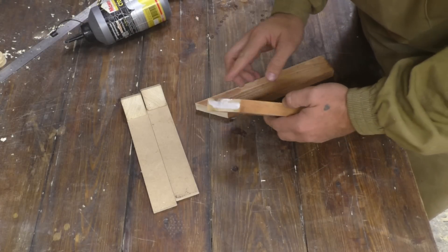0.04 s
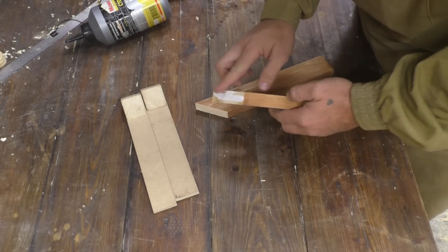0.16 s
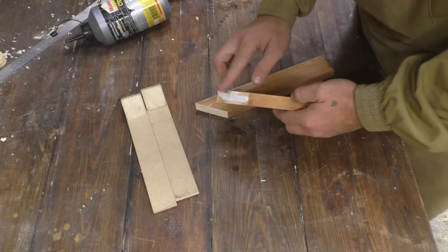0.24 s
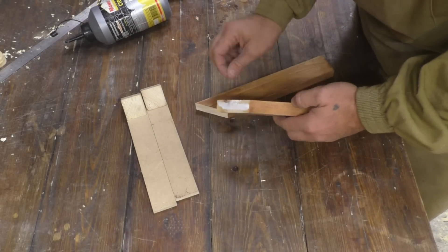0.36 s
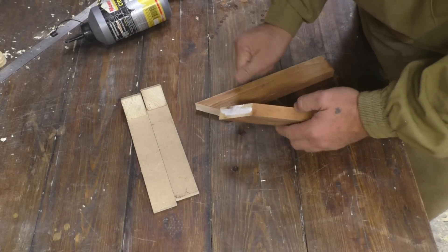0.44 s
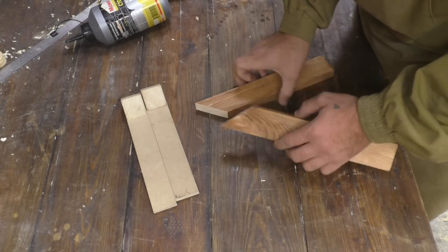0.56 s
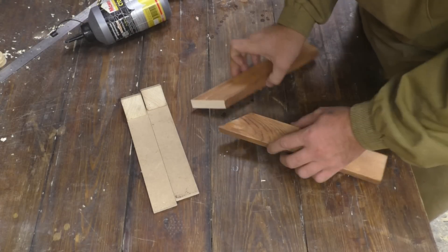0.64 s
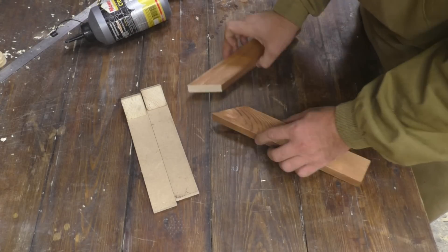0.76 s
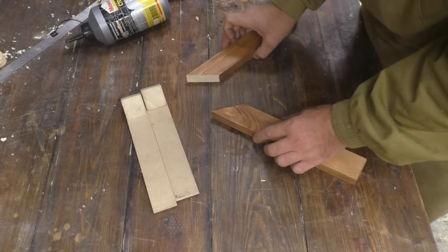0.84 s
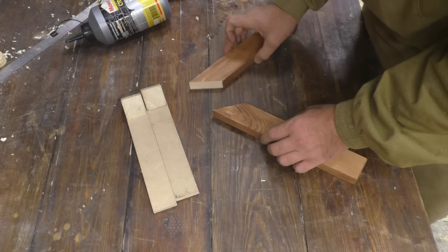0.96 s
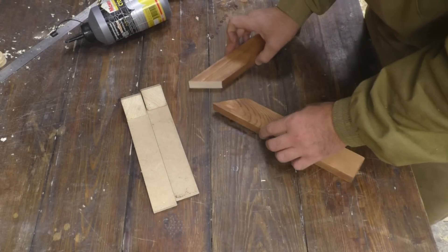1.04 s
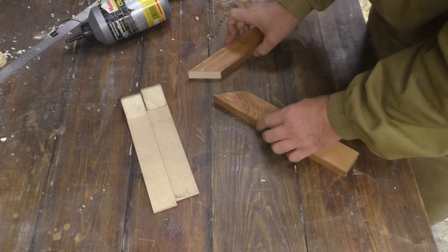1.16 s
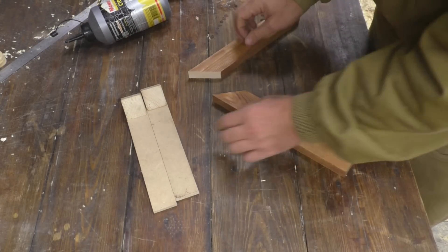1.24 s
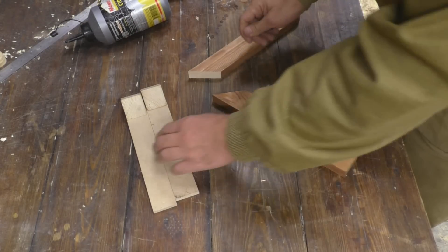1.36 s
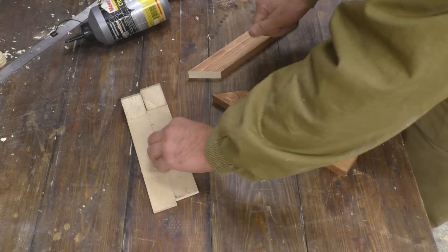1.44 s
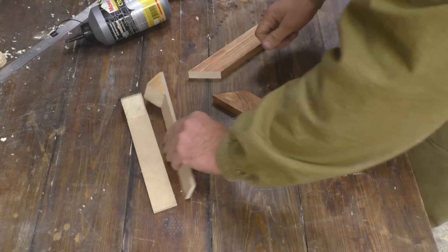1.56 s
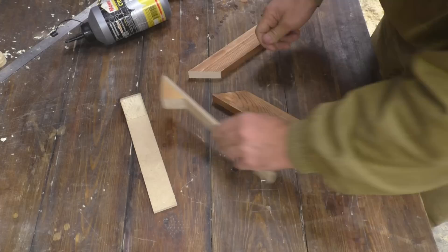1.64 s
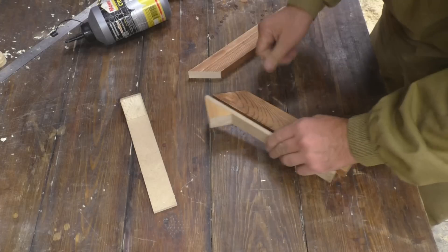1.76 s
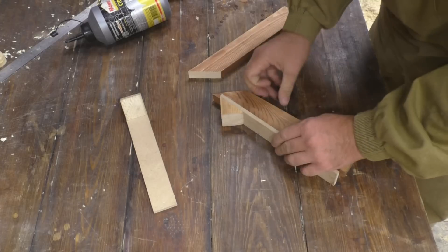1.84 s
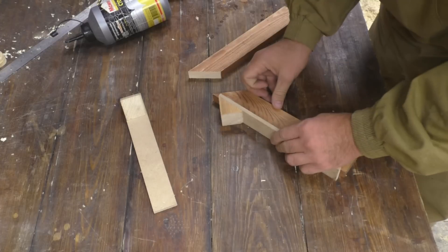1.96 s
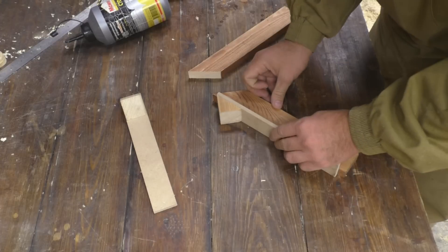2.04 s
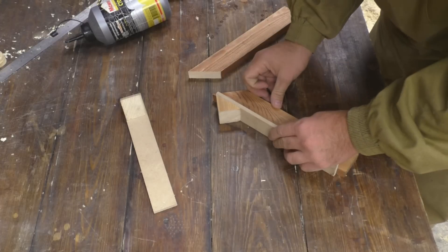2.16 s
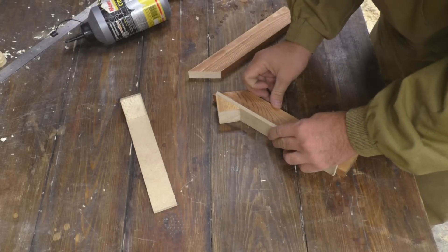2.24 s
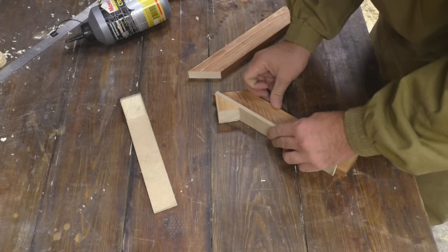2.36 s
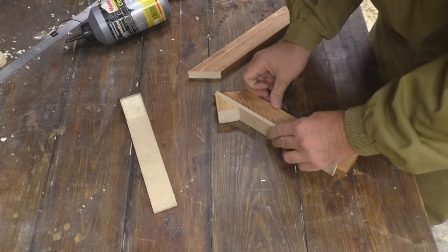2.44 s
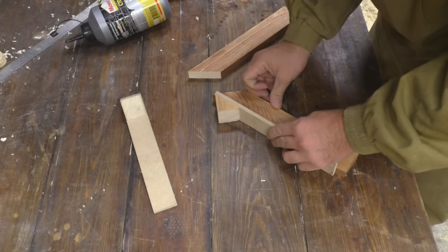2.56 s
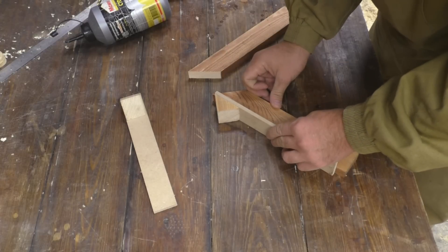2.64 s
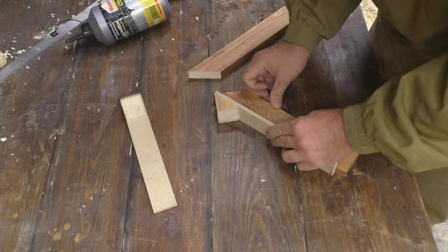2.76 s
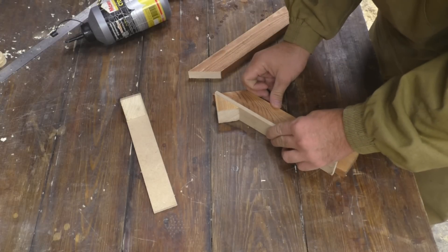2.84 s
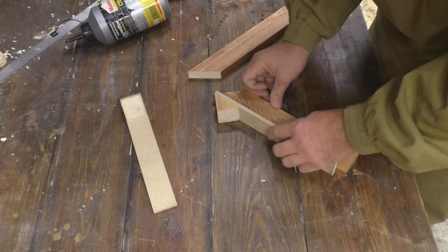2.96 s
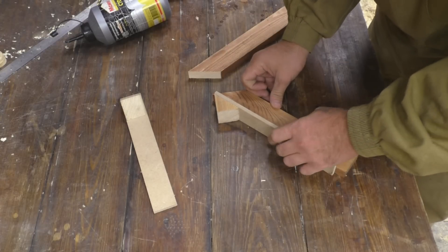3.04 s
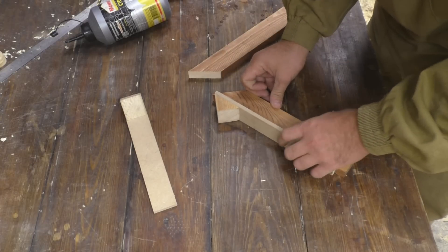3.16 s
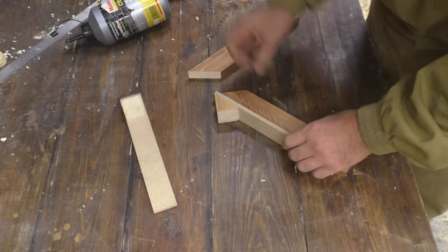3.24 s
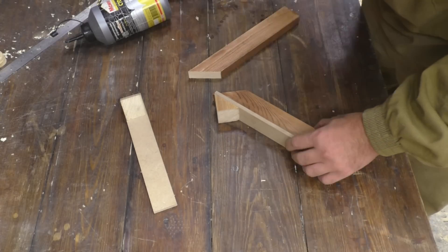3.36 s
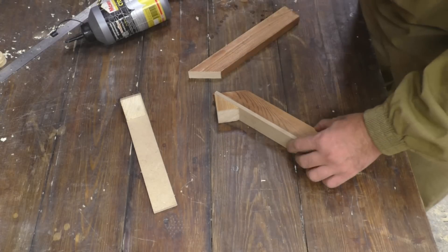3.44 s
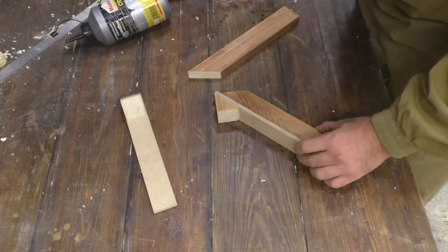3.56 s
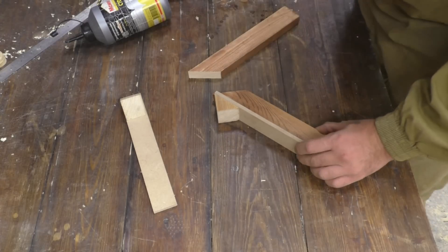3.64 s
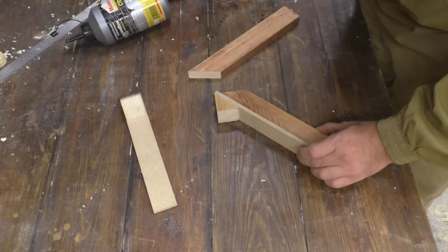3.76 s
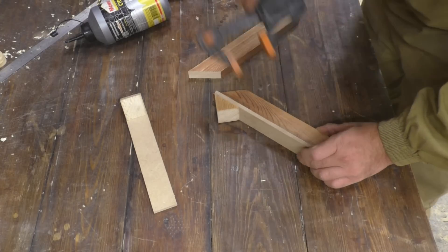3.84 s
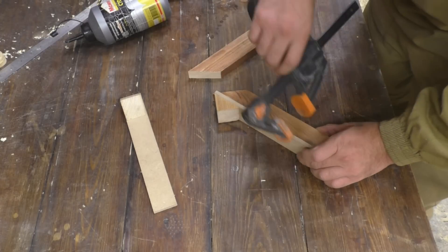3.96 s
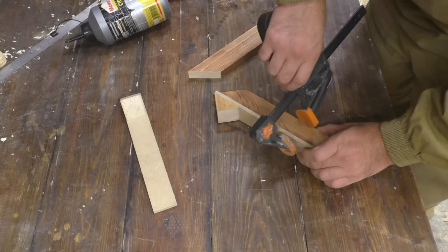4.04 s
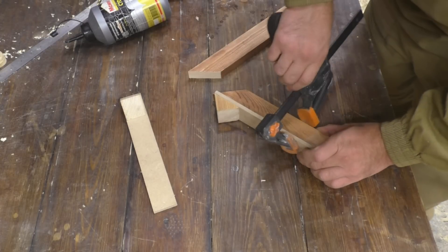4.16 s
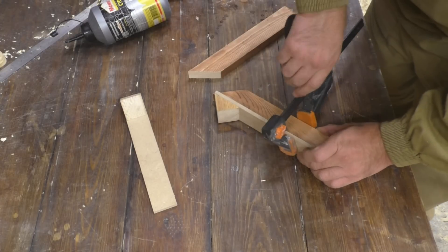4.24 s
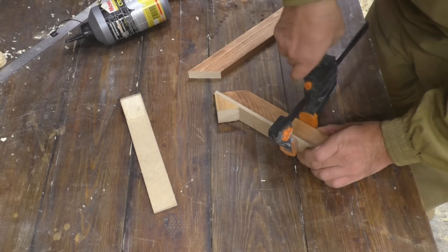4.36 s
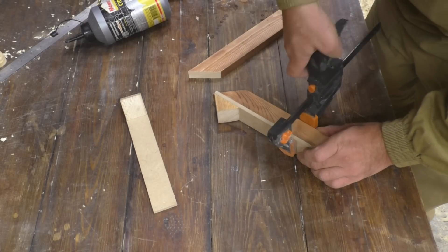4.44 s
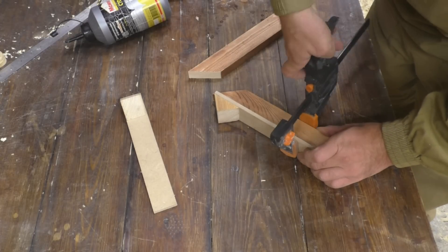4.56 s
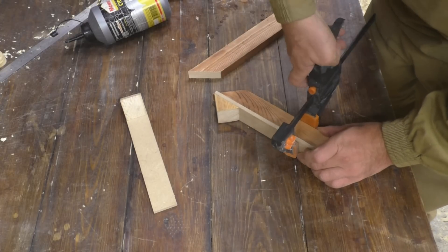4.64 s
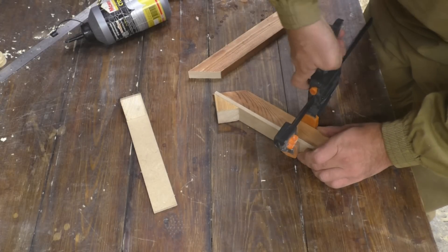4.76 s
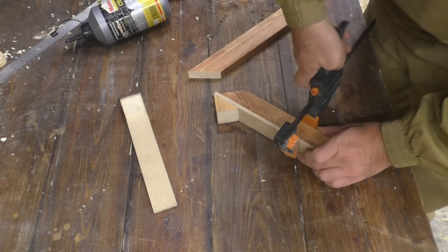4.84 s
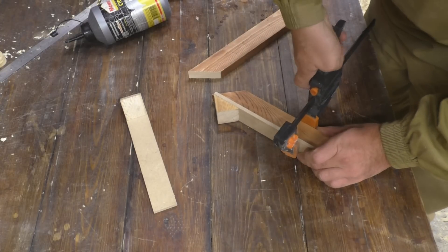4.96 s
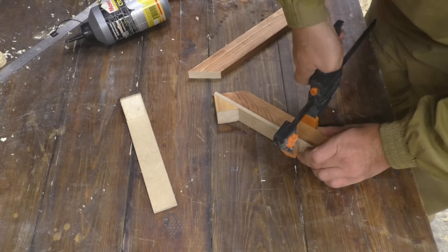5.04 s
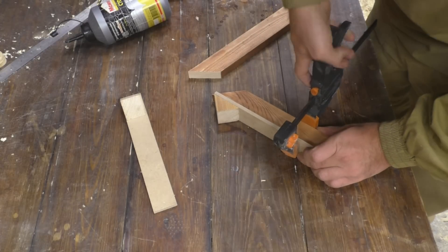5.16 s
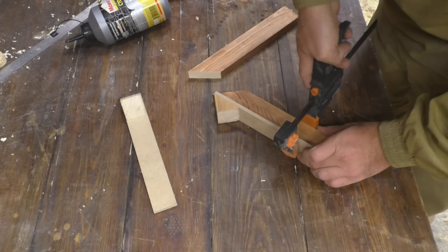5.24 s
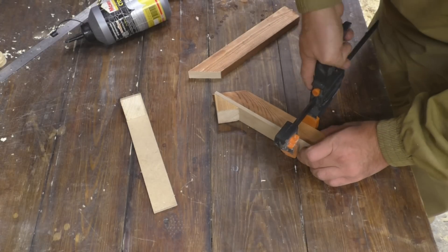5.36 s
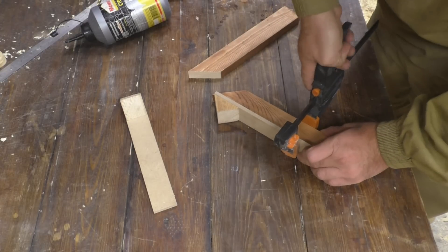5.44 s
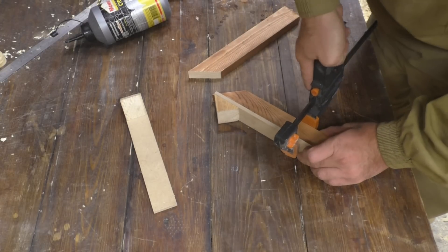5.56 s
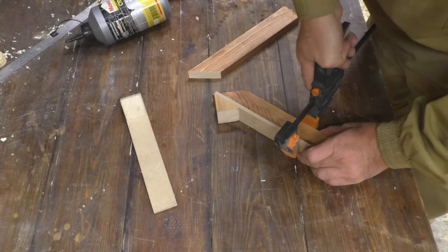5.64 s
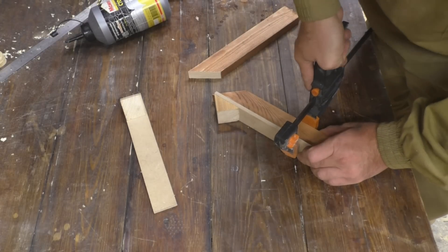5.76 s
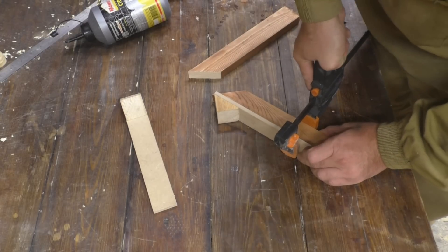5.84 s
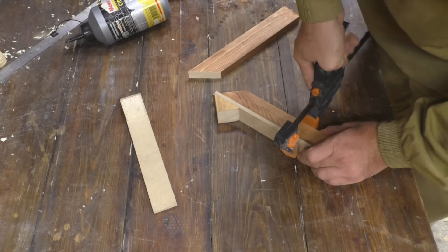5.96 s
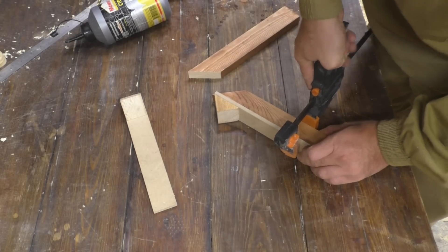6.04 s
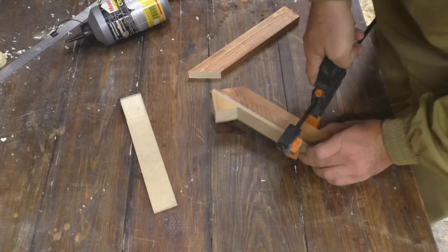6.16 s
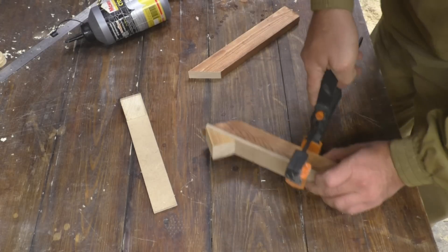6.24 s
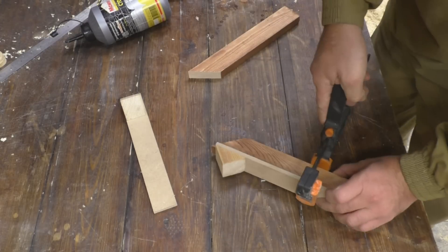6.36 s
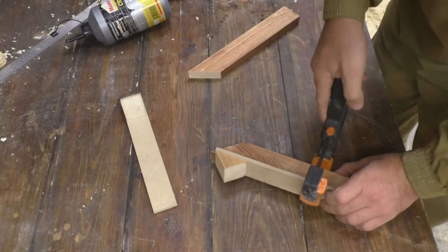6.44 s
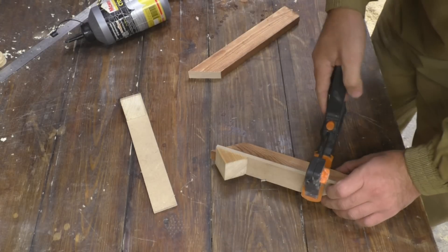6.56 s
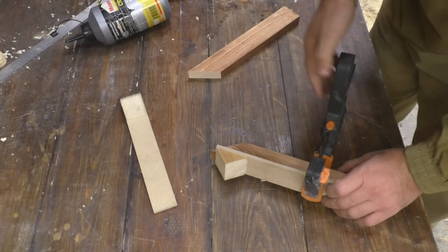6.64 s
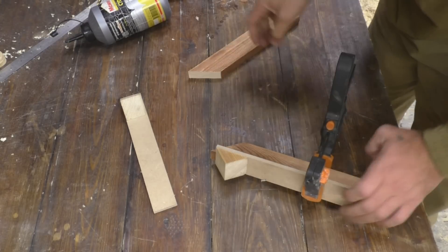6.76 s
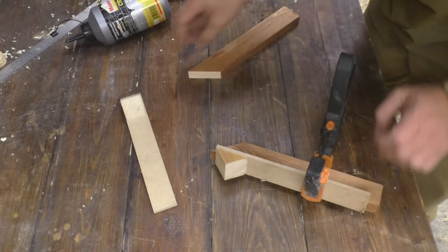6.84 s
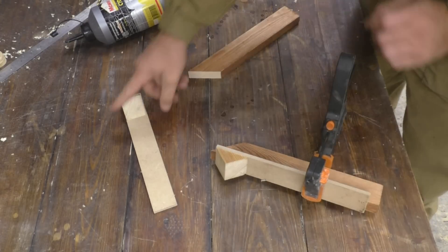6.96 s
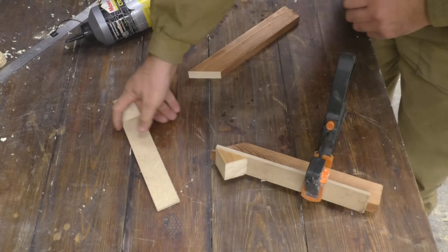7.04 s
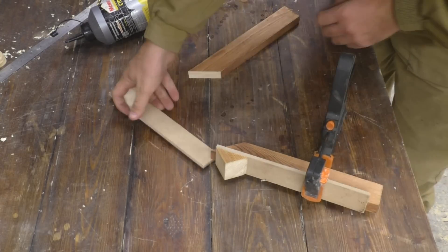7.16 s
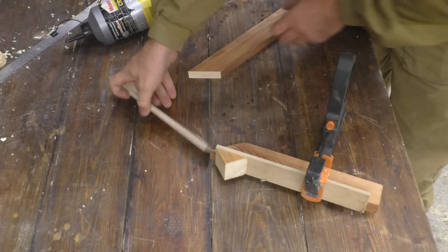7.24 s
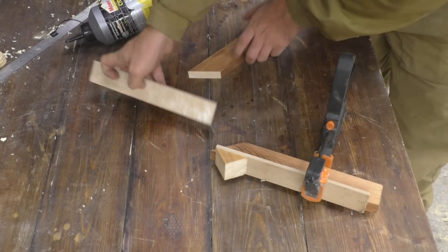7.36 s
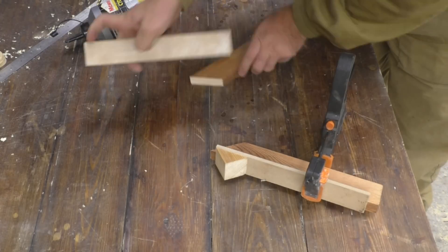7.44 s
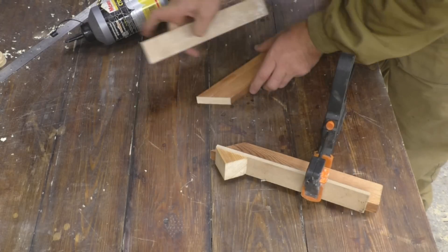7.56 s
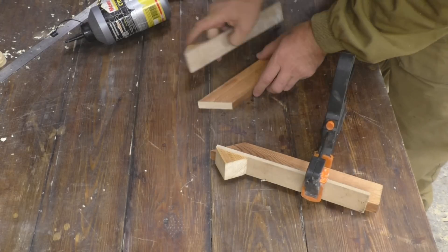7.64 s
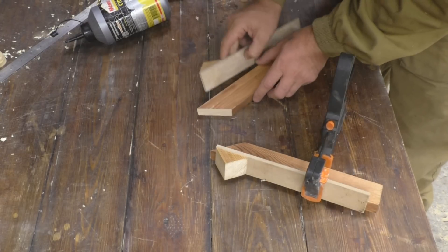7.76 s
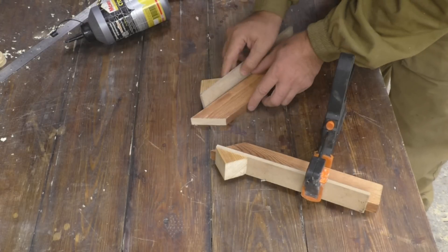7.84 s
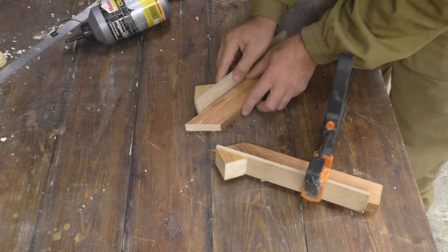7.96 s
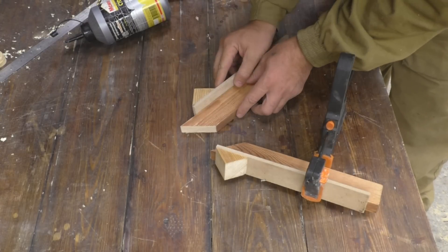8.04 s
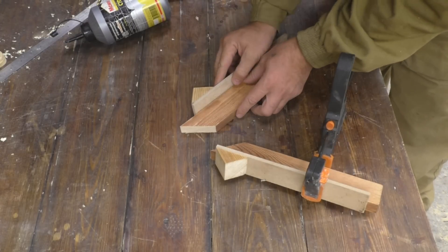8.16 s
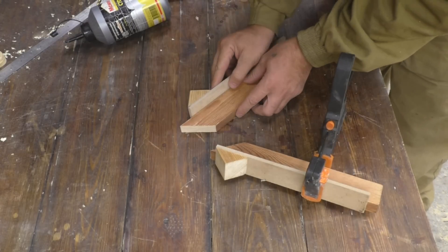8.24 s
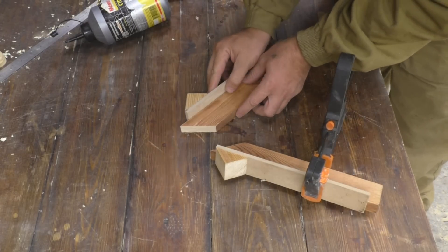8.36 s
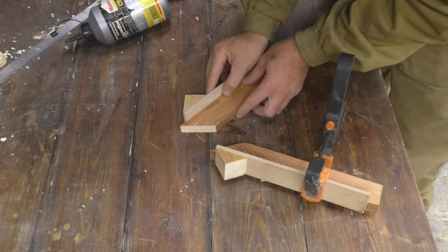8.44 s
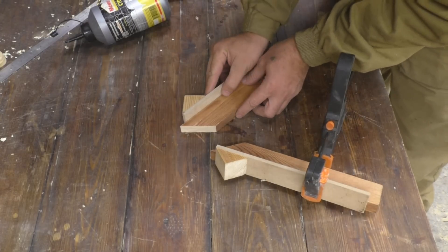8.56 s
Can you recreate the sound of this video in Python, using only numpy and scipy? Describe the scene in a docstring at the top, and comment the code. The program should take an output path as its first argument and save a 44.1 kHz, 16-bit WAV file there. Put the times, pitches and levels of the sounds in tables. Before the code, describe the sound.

Close, detailed sounds of glueing up wood at a bench. Dry slat knocks and short gritty slides come first, then near silence with faint cloth and skin rubbing. A plastic quick-release clamp taps on and clicks tight, the brightest snaps near the middle. A solid wooden thump follows, then busier sliding and tapping of another slat pair. Soft room air, very little echo.

```python
"""A quiet, fairly dry workshop: soft air, hands and sleeves rustling, and at first a faint far hiss that stops.
Wooden slats are slid and knocked together close by, then after a lull they knock again.
A plastic quick-release clamp is squeezed shut click by click and bumps down with the glued pieces.
Last, more slats are slid and set down on the plank bench. Every blow drives decaying modes of piece and bench;
rubbing is coloured, grainy noise, and squeals are narrow gliding bands of noise."""
import sys
import numpy as np
from scipy import signal
from scipy.fft import rfft, irfft, next_fast_len
from scipy.io import wavfile
from scipy.ndimage import uniform_filter1d, map_coordinates

SR = 44100
rng = np.random.default_rng(int(sys.argv[2]) if len(sys.argv) > 2 else 0)


def transcribe(signal):
    """Save signal, clipped to [-1, 1], as a 16-bit WAV file at the path in sys.argv[1]."""
    frames = np.atleast_2d(signal).T
    limited = np.clip(frames, -1, 1)
    pcm = np.round(limited * 32767).astype(np.int16)
    wavfile.write(sys.argv[1], SR, pcm)


N = 379701
BLOW_T = np.arange(int(.3 * SR)) / SR  # time within one blow, s


def undb(db):
    """Decibels to gain."""
    return 10 ** (np.asarray(db) / 20)


def unit(x):
    """Scale to rms 1."""
    return x / np.sqrt(np.mean(x ** 2))


def fade(t60_s):
    """Exponential decay over the length of one blow, 60 dB down after t60_s."""
    return np.exp(-np.log(1000) * BLOW_T / t60_s)


def colour_gain(f, spectrum):
    """Gain at frequencies f, read from a (pitch_hz, level_db) colour on a log pitch scale."""
    pitch_hz, level_db = np.transpose(spectrum)
    return undb(np.interp(np.log(f), np.log(pitch_hz), level_db))


def tint(x, spectrum):
    """Give a sound a (pitch_hz, level_db) colour, at rms 1."""
    size = next_fast_len(len(x), True)
    f = np.maximum(np.fft.rfftfreq(size, 1 / SR), 1)
    coloured = irfft(rfft(x, size) * colour_gain(f, spectrum), size)
    return unit(coloured[:len(x)])


def noise(spectrum, size):
    """Noise of rms 1 with a (pitch_hz, level_db) colour."""
    return tint(rng.standard_normal(size), spectrum)


def walk(rate_hz):
    """Smooth random drift of rms 1, changing rate_hz times a second."""
    hold = max(int(SR / rate_hz), 2)
    steps = np.repeat(rng.standard_normal(N // hold + 1), hold)
    return unit(uniform_filter1d(steps, hold)[:N])


def stereo(mid, side):
    """Left and right from mid and side."""
    return np.array([mid + side, mid - side])


def resonant(peaks):
    """(pitch_hz, level_db) colour of a set of steep-sided resonances."""
    f = np.geomspace(20, SR / 2, 600)
    power = 0
    for pitch_hz, width_hz, level_db in peaks:
        detuning = (f - pitch_hz ** 2 / f) / width_hz
        power = power + undb(level_db) ** 2 / (1 + detuning ** 2) ** 2
    return np.column_stack([f, 10 * np.log10(power)])


def pulse(spectrum):
    """The sharpest causal (minimum-phase) click with a (pitch_hz, level_db) colour, energy 1."""
    size = len(BLOW_T)
    f = np.maximum(np.fft.rfftfreq(size, 1 / SR), 1)
    cepstrum = irfft(np.log(colour_gain(f, spectrum)), size)
    # folding the cepstrum onto positive time puts the energy as early as it can be
    click = irfft(np.exp(rfft(2 * cepstrum[:size // 2], size)), size)
    return click / np.sqrt(np.sum(click ** 2))


# Colour of the workshop air: pitch_hz, level_db (relative, per Hz)
AIR_COLOUR = [(15, -55), (25, -12), (106, -8), (172, -5), (257, -6), (404, -5), (529, -9), (811, -12),
              (1130, -26.5), (1500, -25), (2400, -15.5), (5500, -20.5), (15000, -35.5)]
# Resonances of the faint far hiss: pitch_hz, width_hz, level_db
FAR_HISS_PEAKS = [(3350, 790, -1), (5700, 400, -1.5)]
FAR_HISS_FROM_S, FAR_HISS_TO_S, FAR_HISS_DB = 0.43, 2.47, -72.5
AIR_DB, RUMBLE_DB = -68, -88
WHINE_HZ, WHINE_DB = 800, -81


def air():
    """The quiet workshop: coloured noise, a faint wide rumble, a thin drifting tone and a far hiss that stops."""
    t = np.arange(N) / SR
    rumble = noise([(70, -15), (200, -1), (1000, -5), (8000, -68)], N)
    whine_hz = WHINE_HZ * (1 + 0.00509 * walk(11))
    whine = undb(WHINE_DB) * np.sin(2 * np.pi * np.cumsum(whine_hz) / SR)
    # the far hiss fades in and out over 50 ms
    heard = np.clip(20 * np.minimum(t - FAR_HISS_FROM_S, FAR_HISS_TO_S - t), 0, 1)
    hiss = undb(FAR_HISS_DB) * heard * noise(resonant(FAR_HISS_PEAKS), N)
    bed = undb(AIR_DB) * stereo(noise(AIR_COLOUR, N), 0.95 * noise(AIR_COLOUR, N))
    return bed + stereo(whine + hiss, undb(RUMBLE_DB) * rumble)


def strokes(rows, attack_s, release_s):
    """Power of movements, and of their hiss: each gathers speed, holds and dies away."""
    t = np.arange(N) / SR
    power = hiss_power = 0
    for start_s, length_s, level_db, hiss_db in rows:
        rise = np.clip((t - start_s) / attack_s, 0, 1)
        fall = np.exp(-np.clip((t - start_s - length_s) / release_s, 0, 20))
        swell = (undb(level_db) * rise * fall) ** 2
        power = power + swell
        hiss_power = hiss_power + swell * undb(hiss_db) ** 2
    return power, hiss_power


HISS_WANDER_HZ = 31  # how often the drift of the hiss turns


def friction(power, spectrum, grain_db, grain_hz, width, wander=0):
    """Rubbing surfaces catch and slip; each uneven grain rings the resonances, which may drift in pitch."""
    grains = undb(grain_db * walk(grain_hz))
    mid = tint(grains * rng.standard_normal(N), spectrum)
    side = tint(grains * rng.standard_normal(N), spectrum)
    sound = stereo(mid, width * side)
    if wander:
        # reading the sound at an uneven pace bends its pitch
        place = np.cumsum(1 + wander * walk(HISS_WANDER_HZ))
        sound = np.array([map_coordinates(channel, [place], order=3, mode="mirror") for channel in sound])
    return sound * np.sqrt(power)


# Bench top modes: pitch_hz, level_db, t60_s; played here by dragging and in strikes() by every blow
BENCH_MODES = [(129, -23, 0.22), (171.1, 4.5, 0.21), (272, 2, 0.013), (347.3, -8, 0.26), (394, -7, 0.17),
               (420, -1.5, 0.037), (504.5, -5.5, 0.19), (568.7, -0.5, 0.054), (623.3, -0.5, 0.095),
               (673, 2, 0.069), (722, -13, 0.3), (763, -1.5, 0.1), (846, -3, 0.11), (909, 1, 0.091)]
# Slat modes: pitch_hz (before retuning to each blow), level_db, t60_s; also played by wood()
SLAT_MODES = [(1030, -13, .05), (1240, -11, .06), (1505, -6, .07), (1738, -3, .1), (2095, -3, .08),
              (2300, -4, .07), (2400, -4, .08), (2850, -7, .05), (3660, -3, .06), (3950, -6, .05),
              (4662, -7, .05), (6000, -8, .05)]
# Broad rumble of dragging: pitch_hz, level_db (relative, per Hz)
DRAG_RUMBLE = [(90, -50), (135, -19), (172, -7.5), (220, -32), (350, 0), (620, 1.5), (850, 0), (1150, -3.5),
               (2000, -25)]
SLAT_DRAG_DB = -7.5  # the dragged slat's own modes against the bench's


def drag_colour():
    """Dragging rubs the bench top and the slat, whose modes stand out of a broad rumble."""
    f, bench_db = resonant([(pitch_hz, 35, level_db) for pitch_hz, level_db, _ in BENCH_MODES]).T
    _, slat_db = resonant([(pitch_hz, 60, level_db) for pitch_hz, level_db, _ in SLAT_MODES]).T
    bench = colour_gain(f, DRAG_RUMBLE) * (0.33 + undb(bench_db))
    slat = undb(SLAT_DRAG_DB + slat_db)
    return np.column_stack([f, 20 * np.log10(bench + slat)])


def snags(per_s, size_db, t60_s):
    """Grit on the planks: brief jolts at random moments, a few large among many small."""
    sizes_db = size_db * np.minimum(rng.exponential(size=N), 2.5)
    jolts = (rng.random(N) < per_s / SR) * (undb(sizes_db) - 1)
    return unit(1 + signal.fftconvolve(jolts, fade(t60_s))[:N])


# A slat's edge catches as it slides: start_s, length_s, level_db
EDGE_CATCHES = [(.689, .026, -45.5), (.718, .006, -44.5), (.843, .022, -53)]
# Resonances of the catching edge: pitch_hz, width_hz, level_db
EDGE_SQUEAK = [(3750, 170, 1), (5500, 830, -15), (6700, 900, -15), (8150, 380, -3), (12700, 600, -8)]


def scrapes():
    """Short squeaky catches of a sliding slat: resonant noise with a rough, fast-moving level."""
    t = np.arange(N) / SR
    swell = 0
    for start_s, length_s, level_db in EDGE_CATCHES:
        corners_s = [start_s, start_s + 0.0014, start_s + length_s / 2, start_s + length_s]
        swell = swell + undb(level_db) * np.interp(t, corners_s, [0, 1, 1, 0])
    roughness = unit(undb(1.4 * walk(970)))
    return noise(resonant(EDGE_SQUEAK), N) * swell * roughness


# A piece is slid over the planks: start_s, length_s, drag_db, hiss_db (its face, against the drag)
SLIDE_MOVES = [(0.57, 0.072, -54, -27), (0.616, 0.12, -53.5, -8), (0.934, 0.1, -55, -4.5),
               (1.068, 0.11, -54, -1.5), (3.538, 0.0073, -56, 11.5), (5.65, 0.091, -61, -27),
               (5.836, 0.11, -57, -31), (7.049, 0.068, -54, -13), (7.14, 0.25, -52, -9.5),
               (7.405, 0.11, -53, -7), (7.484, 0.099, -47.5, -1), (7.582, 0.086, -56.5, -4),
               (7.665, 0.15, -49, -11), (7.835, 0.072, -48.5, -5), (7.922, 0.15, -53, -10),
               (8.242, 0.11, -58, -11), (8.377, 0.052, -58.5, -8)]
# A hand or sleeve moves: start_s, length_s, rustle_db, hiss_db (skin on wood, against the rustle)
HAND_MOVES = [(0.375, 0.13, -74.5, 4.5), (0.73, 0.15, -64.5, -6), (1.22, 0.11, -71.5, -2),
              (1.33, 0.3, -65, 1.5), (1.6, 0.082, -66, -8), (1.7, 0.27, -73, -1), (1.93, 0.079, -63, -6),
              (2.94, 0.074, -73.5, -2), (3.11, 0.24, -74, 0), (3.39, 0.26, -65, -0.5),
              (3.55, 0.15, -63, -1.5), (3.86, 0.021, -63, -9.5), (3.92, 0.13, -79.5, 5),
              (4.26, 0.12, -63.5, -2.5), (4.4, 0.26, -67.5, -2.5), (4.73, 0.3, -66, -5),
              (5.11, 0.13, -64.5, -18), (5.3, 0.12, -65, -8), (5.55, 0.24, -71.5, -17),
              (5.95, 0.13, -68, -8), (6.085, 0.049, -62.5, -2.5), (6.22, 0.19, -76.5, -1),
              (6.45, 0.28, -65, -8), (6.74, 0.089, -67.5, -15), (6.84, 0.12, -63.5, -10),
              (6.96, 0.16, -61.5, -5), (8.11, 0.38, -67, -16)]
# Colour of cloth rustle: pitch_hz, level_db (relative, per Hz)
RUSTLE_COLOUR = [(700, -6), (1400, -10.5), (2300, 3), (3600, 0), (5000, -2), (5700, -3.5), (6600, -6.5),
                 (12000, -17)]
# Resonances of a sliding slat's hiss: pitch_hz (before drift), width_hz, level_db
SLAT_HISS = [(3320, 560, -3), (6450, 1500, -1.5), (8240, 600, -0.5), (9200, 1800, -6), (11160, 1300, -8.5),
             (12960, 1100, -5.5), (14500, 2000, -13)]
# Colour of skin brushing wood: pitch_hz, level_db (relative, per Hz)
SKIN_COLOUR = [(2000, -13), (4000, -5), (7000, -3.5), (10000, -6.5), (14000, -5.5), (16000, -12)]
SLIDE_RUSTLE_DB = -8  # the hand moves along with the piece
REACH_DRAG_DB = -1.5  # the hands also rub the work
REST_DRAG_DB, REST_RUSTLE_DB = -79, -76  # hands that only hold the work


def handling():
    """Wood dragged over the planks, cloth and skin moving along with it: four kinds of friction noise."""
    slide, face = strokes(SLIDE_MOVES, attack_s=0.015, release_s=0.022)
    reach, skin = strokes(HAND_MOVES, attack_s=0.015, release_s=0.067)
    drag_power = slide + reach * undb(REACH_DRAG_DB) ** 2 + undb(REST_DRAG_DB) ** 2
    rustle_power = reach + slide * undb(SLIDE_RUSTLE_DB) ** 2 + undb(REST_RUSTLE_DB) ** 2
    drag = friction(drag_power, drag_colour(), grain_db=4.5, grain_hz=300, width=0.14)
    rustle = friction(rustle_power, RUSTLE_COLOUR, grain_db=-0.5, grain_hz=440, width=0.39)
    # the hiss drifts with speed and grip
    hiss = friction(face, resonant(SLAT_HISS), grain_db=1.0, grain_hz=700, width=0.23, wander=0.02)
    brush = friction(skin, SKIN_COLOUR, grain_db=2.0, grain_hz=330, width=0.15)
    rubbing = drag + rustle + hiss + brush
    return rubbing * snags(per_s=110, size_db=2.1, t60_s=0.022) + scrapes()


SQUEAL_WIDTH_HZ, SQUEAL_EDGE_S, SQUEAL_GRAIN_DB = 650, .016, 2


def narrow(start_s, length_s, first_hz, last_hz, level_db):
    """A narrow band of noise that swells, glides and fades: slow noise carried up to a moving pitch."""
    out, t = np.zeros(N), np.arange(int(length_s * SR)) / SR
    low_pass = signal.butter(2, SQUEAL_WIDTH_HZ / 2, fs=SR, output="sos")
    band = signal.sosfilt(low_pass, rng.standard_normal((2, SR)))[:, :len(t)]
    phase = 2 * np.pi * np.cumsum(np.linspace(first_hz, last_hz, len(t))) / SR
    tone = unit(band[0] * np.cos(phase) + band[1] * np.sin(phase))
    swell = np.clip(np.minimum(t, length_s - t) / SQUEAL_EDGE_S, 0, 1)
    start = int(start_s * SR)
    out[start:start + len(t)] = undb(level_db) * swell * tone
    return out


# A rubbing face half sings, its pitch drifting with the grip: start_s, length_s, first_hz, last_hz, level_db
SINGING_FACES = [(0.185, 0.037, 5000, 4930, -61.5), (0.619, 0.032, 6650, 6340, -60),
                 (.94, 0.054, 6300, 6450, -59), (0.988, 0.068, 8100, 7900, -62),
                 (1.081, 0.099, 5950, 6400, -57.5), (4.288, 0.11, 5900, 5430, -63),
                 (4.418, 0.11, 5160, 4300, -68), (6.888, 0.16, 3850, 4060, -66.5),
                 (7.473, .045, 6800, 7000, -56), (7.502, 0.12, 6300, 6200, -53.5),
                 (7.679, 0.041, 6230, 6270, -51), (7.762, 0.2, 6860, 6730, -63),
                 (7.95, 0.1, 6500, 6600, -66)]


def squeals():
    """Sliding slats and the clamp's bar sing thinly for a moment, in fits and starts."""
    singing = sum(narrow(*row) for row in SINGING_FACES)
    return singing * unit(undb(SQUEAL_GRAIN_DB * walk(400)))


def ring(modes, scatter_db, detune):
    """Decaying modes, all pushed the same way; struck spot and grip shift their weights and pitch."""
    pitch_hz, level_db, t60_s = np.transpose(modes)[:, :, None]
    weight, shift = rng.standard_normal((2, len(modes), 1))
    waves = np.sin(2 * np.pi * pitch_hz * (1 + detune * shift) * BLOW_T)
    return np.sum(undb(level_db + scatter_db * weight) * fade(t60_s) * waves, axis=0)


def retuned(modes, high_hz):
    """Pieces differ in length and grip: all modes move together until the nearest lies on the high ring."""
    ratios = [high_hz / pitch_hz for pitch_hz, _, _ in modes]
    shift = min(ratios, key=lambda ratio: abs(np.log(ratio)))
    return [(pitch_hz * shift, level_db, t60_s) for pitch_hz, level_db, t60_s in modes]


PUSH_SOFT_MS = 5.4  # a touch that chatters this long starts with half the push


def contact(chatter_ms, grain, edge, edge_hz):
    """Force of a touch: a push, then dying slips that spread it in time; its stiffness alone colours it."""
    slips = rng.standard_normal(len(BLOW_T)) * (rng.random(len(BLOW_T)) < .03)
    force = grain * slips * np.exp(-BLOW_T / (max(chatter_ms, .1) / 1000))
    force[0] = 1 / (1 + chatter_ms / PUSH_SOFT_MS)
    f = np.maximum(np.fft.rfftfreq(len(BLOW_T), 1 / SR), 1)
    # take out the broad colour of the random slips, then put in that of the contact
    ripple_db = 10 * np.log10(uniform_filter1d(np.abs(rfft(force)) ** 2, size=40))
    multiple, level_db = np.transpose(edge)
    colour_db = np.interp(np.log(f / edge_hz), np.log(multiple), level_db)
    colour = np.column_stack([f, colour_db - ripple_db])
    return signal.fftconvolve(force, pulse(colour))[:len(BLOW_T)]


# Borders of the registers thud, knock, body, clack and tick: pitch_hz
REGISTER_HZ = [120, 250, 560, 1030, 3300, 16000]
REGISTER_BLEND = 1.12  # each register blends into the next over a small pitch ratio
ATTACK = int(.025 * SR)  # samples over which a register's level is set


def blow(body, levels_db, force):
    """A contact rings the body; weight and hardness set each register's strength, all starting together."""
    sound = signal.fftconvolve(body, force[None], axes=1)[:, :len(BLOW_T)]
    colour = []
    for level_db, low_hz, high_hz in zip(levels_db, REGISTER_HZ, REGISTER_HZ[1:]):
        band = signal.butter(3, [low_hz, high_hz], "band", fs=SR, output="sos")
        part = signal.sosfilt(band, sound[:, :ATTACK])
        gain_db = level_db - 10 * np.log10(np.mean(part ** 2))
        colour += [(low_hz * REGISTER_BLEND, gain_db), (high_hz / REGISTER_BLEND, gain_db)]
    click = pulse(colour)
    # the click has energy 1, so bring its peak back to the strongest register gain
    gain = undb(max(gain_db for _, gain_db in colour)) / np.abs(rfft(click)).max()
    return gain * signal.fftconvolve(sound, click[None], axes=1)[:, :len(BLOW_T)]


def strikes(table, modes, colour, edge, snap_db, bench_db, modes_db, low_db, low_t60, high_db, high_t60,
            crack_t60, dense_db, dense_t60, room_db, room_t60, tail_hz, width, grain, pan_db):
    """Each blow: a snap and a crack, modes of piece and bench, a wash of denser modes, the room's short tail."""
    size = len(BLOW_T)
    out = np.zeros((2, N + size))
    snap = undb(snap_db) * pulse(colour)
    dull = signal.butter(1, min(tail_hz, SR / 2 - 1), fs=SR)  # the tails lose their treble
    room_onset = 1 - np.exp(-BLOW_T / 0.011)  # the walls answer a few milliseconds later
    for start_s, *levels_db, chatter_ms, low_hz, high_hz, edge_hz in table:
        crack = noise(colour, size) * fade(crack_t60)
        tails = [signal.lfilter(*dull, noise(colour, size)) for _ in range(4)]
        dense, dense_side, room, room_side = tails
        bench = undb(bench_db) * ring(BENCH_MODES, scatter_db=5.0, detune=0.0057)
        piece = undb(modes_db) * ring(retuned(modes, high_hz), scatter_db=1.0, detune=0.0096)
        # the place of the blow favours two modes
        favoured = [(low_hz, low_db, low_t60), (high_hz, high_db, high_t60)]
        tones = bench + piece + ring(favoured, scatter_db=2.5, detune=0)
        wash = undb(dense_db) * stereo(dense, width * dense_side) * fade(dense_t60)
        echo = undb(room_db) * stereo(room, room_side) * fade(room_t60) * room_onset
        body = snap + tones + crack + wash + echo
        start = int(start_s * SR)
        out[:, start:start + size] += blow(body, levels_db, contact(chatter_ms, grain, edge, edge_hz))
    # pieces this small radiate no deep bass
    out = signal.sosfilt(signal.butter(5, 118, "high", fs=SR, output="sos"), out[:, :N])
    return out * undb(np.array([[pan_db], [-pan_db]]) / 2)  # pan_db: left against right


CATCH_LOW_HZ, CATCH_HIGH_HZ = 792, 4066  # the two main rings of a catch
CATCH_THUD_DB, CATCH_KNOCK_DB, CATCH_CLACK_DB = -8.5, -5.5, 2  # its registers against the wood's body
CATCH_CLACK_SHARE = 0.17  # how far the clack follows the snap rather than the wood


def click_registers(start_s, snap_db, wood_db, chatter_ms, bright_hz):
    """The snap is the tick; what passes into the wood fills the registers below it."""
    body = snap_db + wood_db
    thud, knock = body + CATCH_THUD_DB, body + CATCH_KNOCK_DB
    clack = body - CATCH_CLACK_SHARE * wood_db + CATCH_CLACK_DB
    return start_s, thud, knock, body, clack, snap_db, chatter_ms, CATCH_LOW_HZ, CATCH_HIGH_HZ, bright_hz


# Clamp catches, bar scrapes and other small hard ticks:
# start_s, snap_db, wood_db (share passed into the wood), chatter_ms, bright_hz (brightest pitch)
CLAMP_CLICKS = [(0.447, -58.5, -26, 1, 12400), (1.412, -66, -20, 3, 10000),
                (1.7275, -58.5, -19, 6.6, 11200), (3.244, -71.5, 1.5, 2.8, 6000),
                (3.4405, -55, -20, .1, 5930), (4.486, -56.5, -13.5, 4.6, 5400), (4.504, -63, -8, 6, 4800),
                (4.522, -55.5, -13, 3.4, 6550), (4.5775, -43.5, -6.5, 1.1, 6660),
                (4.879, -57.5, -9, 1, 4200), (4.9053, -29.5, -20, 0.67, 6300), (4.991, -54, -5, 5.8, 3700),
                (5.1432, -42.5, -13, 0.67, 4350), (5.1541, -35.5, -11.5, 0.56, 6100),
                (5.3144, -66, 0.5, 1.8, 2180), (5.503, -59, -3, 8.2, 3080), (5.531, -46, -13.5, 1.5, 6300),
                (5.833, -45, -14.5, 1.1, 5200), (5.902, -66, -4, 4, 6200), (5.9329, -55.5, -10, 2.6, 6200),
                (5.957, -54.5, -5.5, 3.7, 6100), (6.021, -69, 5.5, 1.8, 4960), (6.242, -65, -17, 8, 3830),
                (6.2944, -59.5, -7.5, 1.1, 5670)]
# Modes of the clamp's bar, jaw and catch: pitch_hz (before retuning), level_db, t60_s
CLAMP_MODES = [(1486, -13, .16), (2200, -1, .014), (3140, -4, .02), (4054, 6, .022), (4770, 9, .012),
               (5050, 17, .003), (6100, 4, .022), (6700, 13, .007), (8100, 2, .02), (10800, -6, .015),
               (13000, -4, .015)]
# Colour of the plastic contact: pitch_hz, level_db
CLAMP_CONTACT = [(70, -19), (160, -7), (750, -7.5), (1400, -14), (2800, -5), (4300, 2), (6200, -8.5),
                 (8500, -2), (12500, -4.5), (16000, -2)]
# How the touch colours its blow: multiple (of bright_hz), level_db
CLAMP_EDGE = [(.78, 2.5), (1, 12.5), (1.3, 2.5), (2, -1.5), (3, -9)]


def clamp():
    """The catch bites on the bar: a bright snap with a very short ring."""
    blows = [click_registers(*row) for row in CLAMP_CLICKS]
    return strikes(blows, CLAMP_MODES, CLAMP_CONTACT, CLAMP_EDGE, snap_db=13, bench_db=-26.5, modes_db=-19.0,
                   low_db=-27.5, low_t60=0.22, high_db=-11, high_t60=0.014, crack_t60=0.01,
                   dense_db=-11.0, dense_t60=0.11, room_db=-23, room_t60=0.18,
                   tail_hz=12000, width=0.48, grain=0.96, pan_db=-2.4)


OFF_RING_DB = -6  # whichever of knock and body does not hold the low ring is this much weaker


def knock_registers(start_s, strength_db, weight_db, hardness_db, tick_db, chatter_ms, low_hz, high_hz, edge_hz):
    """Weight drives the thud, hardness the clack and its tick; the sound gathers round the low ring."""
    ring_in_body = low_hz > REGISTER_HZ[2]
    thud = strength_db + weight_db
    knock = strength_db + OFF_RING_DB * ring_in_body
    body = strength_db + OFF_RING_DB * (not ring_in_body)
    clack = strength_db + hardness_db
    return start_s, thud, knock, body, clack, clack + tick_db, chatter_ms, low_hz, high_hz, edge_hz


# Wood knocks on wood: start_s, strength_db, weight_db (into the bench), hardness_db,
# tick_db (against the clack), chatter_ms, low_hz (low ring), high_hz (high ring), edge_hz (upper edge)
WOOD_KNOCKS = [(0.6124, -48.5, -22, -6.5, -15, 1, 785, 1604, 2440),
               (0.7331, -50, -10, -4, -23, 1, 796, 1255, 7000),
               (0.7822, -52, -15, -5.5, -5, 5.9, 776, 1220, 7000),
               (0.843, -48, -26, -16, -9, 3.1, 634, 2400, 8000),
               (.8711, -39, -12, 3, 0, .1, 825, 2086, 8200), (.874, -41, -19, 7, -19, .3, 622, 2403, 2930),
               (0.9944, -56, -6, -0.5, -16, 3, 890, 1670, 2600),
               (1.189, -41, -24, -19, -6, 4.8, 700, 2270, 3000),
               (1.1958, -37.5, -41, -5.5, -3.5, .4, 710, 2240, 7000),
               (1.5045, -52.5, -4, -10.5, -7, 1.2, 664, 2830, 5000),
               (1.573, -53, -30, -8, 2, 3.3, 700, 2330, 7000),
               (1.5796, -37, -12.5, -2, 2, 1.2, 928, 3037, 4760),
               (1.625, -50, -13, -11, -9, 1.2, 650, 2600, 5000),
               (1.8275, -53.5, -18, -10, -16, 4.9, 560, 2060, 2380),
               (1.856, -38, -17, -1, -6, 3.3, 615, 2270, 5140),
               (1.873, -34.5, -16, -0.5, 0, .5, 685, 2453, 5900),
               (1.975, -46.5, -14, -3, -9.5, 2.7, 704, 2193, 2980),
               (2.0306, -51.5, -11, -19, -2, 2, 677, 3140, 4950),
               (3.591, -46.5, -11, -5, -10, 17, 380, 1295, 6000),
               (3.612, -49, -6.5, -5, 0, 9, 490, 2470, 6140),
               (3.6707, -58, -7, 13.5, 2.5, 20.7, 976, 2904, 3630),
               (4.149, -43, -7.5, -11.5, -3, .3, 703, 2180, 6140),
               (4.1718, -49.5, -7, 3.5, -8, 2.1, 387, 2290, 7100),
               (4.212, -50, -22, -4, -5, 15, 377, 1410, 4100),
               (4.248, -36, -8, -9, -11, .5, 730, 2140, 5700),
               (4.2528, -38, -11, -12.5, -1.5, 1.08, 341, 2240, 5700),
               (4.432, -58, -5.5, -19.5, 15, 4, 804, 2400, 5400),
               (4.7449, -51, 2.5, -11, 9, 4.5, 330, 3440, 6460),
               (4.8188, -55, -3, -15, -7, .74, 660, 2250, 5000),
               (4.8934, -51.5, 0, -1, 1, 8, 377, 3390, 6000),
               (5.702, -52.5, -0.5, -21.5, 10.5, 4.1, 363, 2370, 5700),
               (6.3865, -35, 0, -13.5, -2.5, 0.3, 330, 2170, 5200),
               (6.525, -57, 0, -27, 3, 1, 360, 3300, 4000),
               (6.586, -26.5, -17, -12, -0.5, 0.93, 351, 2620, 4230),
               (7.035, -50, -5, -8, -1.5, 3, 456, 1516, 4200),
               (7.1479, -36.5, -21, -3.5, -5, 3.5, 618, 2814, 3080),
               (7.1838, -43.5, -15, -11, -11, 4.6, 630, 1920, 3300),
               (7.199, -41, -29, -3, -4, 3.3, 622, 2010, 3900),
               (7.235, -43, -5, -5, -4, .3, 950, 2630, 4600),
               (7.2792, -43.5, -13, -10, -11, 2.2, 572, 1100, 3000),
               (7.3008, -38, -20, -12.5, 6, 7, 632, 3070, 3230),
               (7.3233, -35.5, -19, 1, -8, 2.5, 894, 2730, 3320),
               (7.714, -40, -32, 4.5, -8, 0.88, 626, 1712, 4470),
               (7.829, -45, -19, -11, -5, 1.1, 628, 1500, 4000),
               (7.846, -47.5, -16, -14, -6, 2.2, 655, 1540, 4000),
               (7.8693, -45.5, -20, -13, -2, 7.5, 593, 1100, 4000),
               (7.946, -52.5, -24, -8, -15, 3, 890, 1490, 2480),
               (8.014, -52, -19, -18, -6, 2, 615, 1490, 2480),
               (8.0686, -38, -15, 3, -2.5, 0.84, 895, 2155, 4900),
               (8.071, -46, -3.5, -7, -6, 1.6, 393, 2270, 4400)]
# Colour of the wooden contact: pitch_hz, level_db
WOOD_CONTACT = [(70, -30), (160, 1.5), (350, -1), (750, 0.5), (1200, -2), (2400, 1.5), (4000, -3.5),
                (5000, -5), (6200, -6.5), (7300, -9), (9300, -14.5), (15000, -26)]
# How the touch colours its blow: multiple (of edge_hz), level_db
WOOD_TOUCH = [(.6, 2), (.93, 7), (1.17, -1), (2, -0.5), (3, 5.5)]


def wood():
    """Slats meet each other and the bench: a snap, then the ringing modes of both."""
    blows = [knock_registers(*row) for row in WOOD_KNOCKS]
    return strikes(blows, SLAT_MODES, WOOD_CONTACT, WOOD_TOUCH, snap_db=19.5, bench_db=-13.0, modes_db=-6,
                   low_db=-4.5, low_t60=0.083, high_db=-4.0, high_t60=0.062, crack_t60=0.021,
                   dense_db=-4.0, dense_t60=0.17, room_db=-24.5, room_t60=0.16,
                   tail_hz=4150, width=0.46, grain=0.67, pan_db=-0.4)


def scene():
    """Everything on and around the bench."""
    return air() + handling() + squeals() + clamp() + wood()


def record(dry):
    """The recorder cuts the top: a steep low-pass at 16.2 kHz."""
    return signal.sosfilt(signal.ellip(8, .2, 70, 16200, fs=SR, output="sos"), dry)


dry = scene()
out = record(dry)
transcribe(out)
```